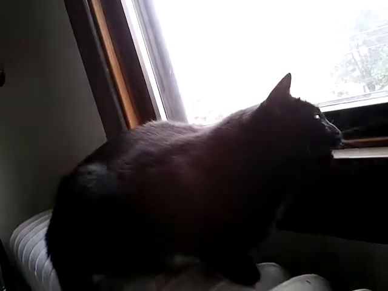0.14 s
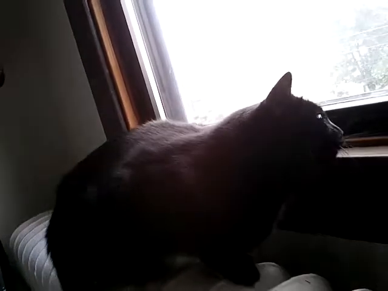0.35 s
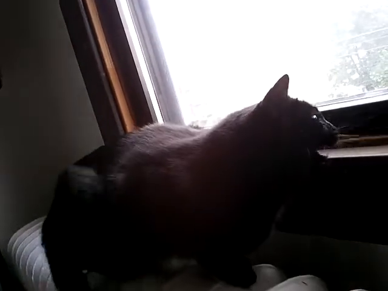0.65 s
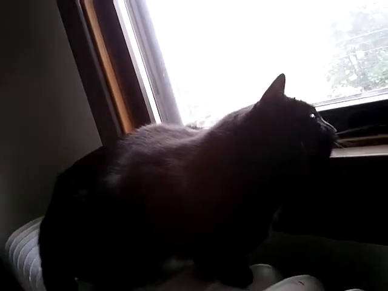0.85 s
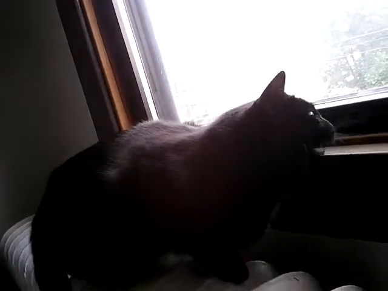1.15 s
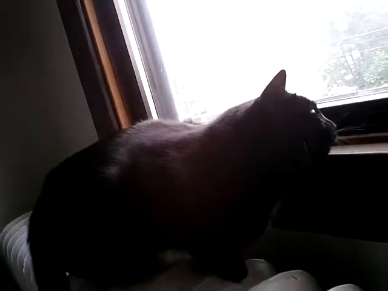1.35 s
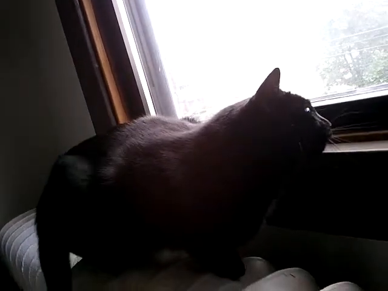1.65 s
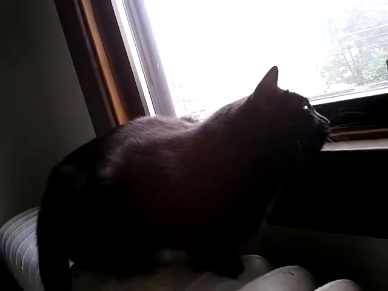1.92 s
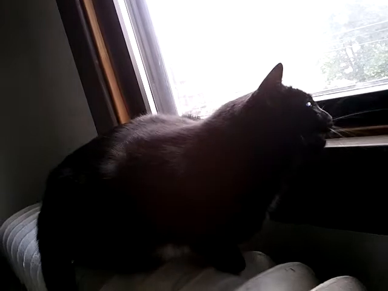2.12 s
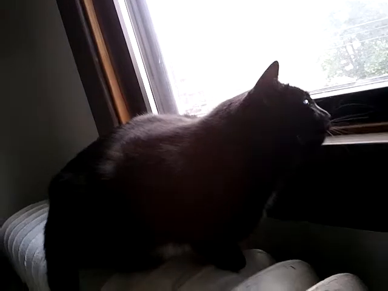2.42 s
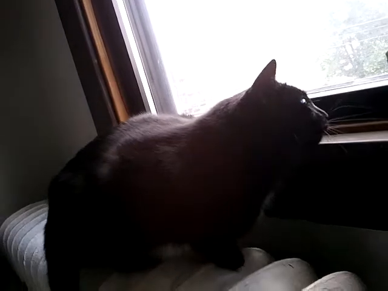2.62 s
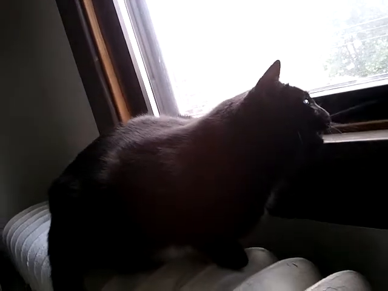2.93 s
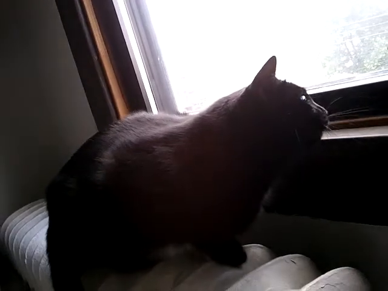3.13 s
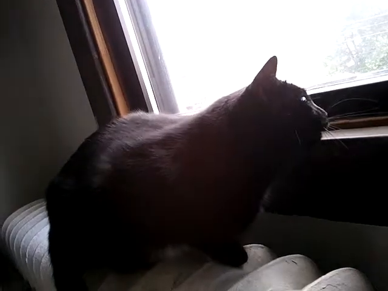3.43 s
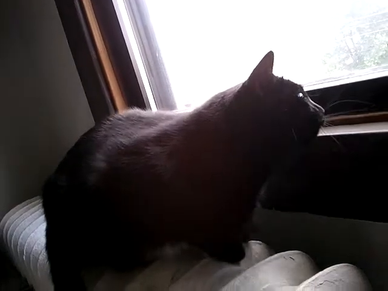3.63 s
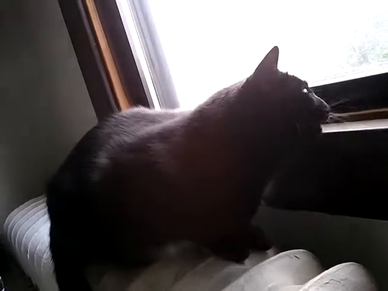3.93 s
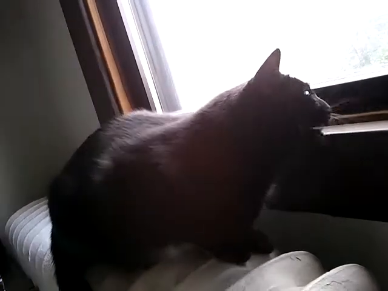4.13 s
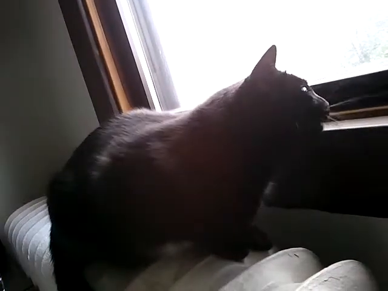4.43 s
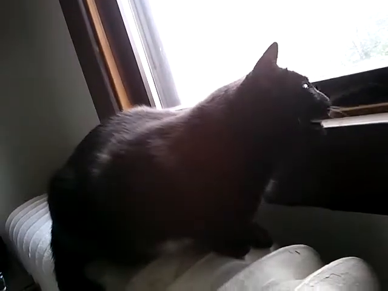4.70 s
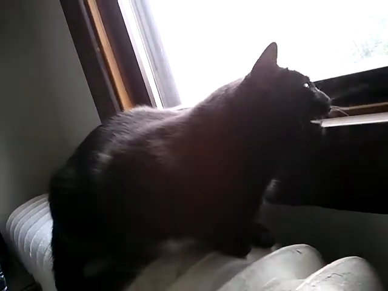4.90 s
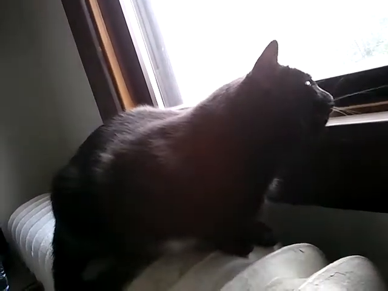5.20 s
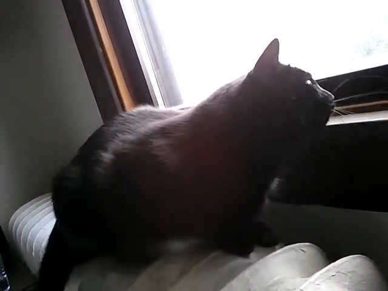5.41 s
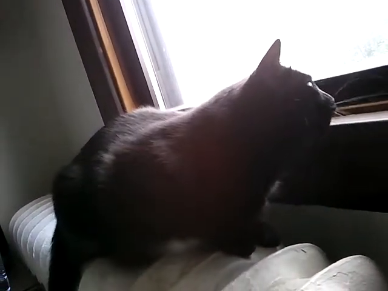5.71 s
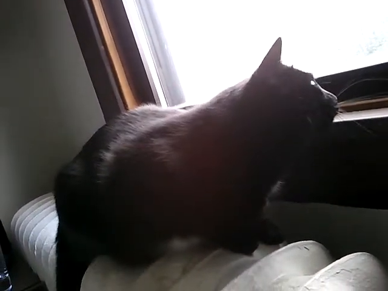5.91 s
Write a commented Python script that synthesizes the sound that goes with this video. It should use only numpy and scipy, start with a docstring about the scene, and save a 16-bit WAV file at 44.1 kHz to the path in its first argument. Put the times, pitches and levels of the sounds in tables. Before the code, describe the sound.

Soft, uneven clicks, breathy rasps and a couple of tiny chirps from a cat, with appliance hum and faint birds outside.

```python
"""Cat chattering at the window

In a small room a cat chatters at birds. Its lips and tongue click as the jaw opens; short raspy puffs
follow, the hard ones with a creak, and twice the voice catches in a chirp. Faint birds and a far engine
come through the glass, over a bed of appliance hum, building drone, street rumble and microphone hiss."""
import sys
import numpy as np
from scipy import signal
from scipy.fft import rfft, irfft, next_fast_len
from scipy.io import wavfile
from scipy.ndimage import uniform_filter1d, map_coordinates

SR = 44100
rng = np.random.default_rng(int(sys.argv[2]) if len(sys.argv) > 2 else 0)


def log_audio(samples):
    """Write samples as a 16-bit WAV file to the path given in sys.argv[1]."""
    # one column per channel
    frames = np.atleast_2d(samples).T
    # limit to full scale, then quantise
    limited = np.clip(frames, -1, 1)
    pcm = np.round(limited * 32767).astype(np.int16)
    wavfile.write(sys.argv[1], SR, pcm)


N = 267069

# noise colours of building, street and microphone: f/Hz, relative density/dB
BUILDING_SPECTRUM = [(12, -15), (24, -10), (34, -0.5), (47, 0), (60, -3), (70, -8), (95, -8), (130, -35.5)]
STREET_SPECTRUM = [(53, -31), (90, -1), (168, -1.5), (222, -4), (255, 0), (296, -8), (344, -5.5),
                   (540, -10), (590, -9), (1800, -17.5), (2340, -38), (3960, -120)]
HISS_SPECTRUM = [(880, -19.5), (1500, -15), (2150, -1), (2700, -2), (3420, -3.5), (3700, -3.5), (5000, -4),
                 (5410, -4), (6710, -4), (7470, -4), (8320, -32.5), (10800, -43.5), (18300, -120)]
# slow swell of the street: t/s, level/dB
STREET_SWELL = [(0.3, -60.5), (1.4, -61.5), (2.8, -62), (3.6, -60), (4.8, -61.1), (5.9, -59.5)]
# tone of the wall echoes: f/Hz, gain/dB
ROOM_EQ = [(300, -12), (1000, 5), (2100, 0), (2900, 4.5), (4200, 1), (5700, -4.5), (7200, 1.5)]
# engine partials: multiple of the firing rate, relative level/dB
ENGINE_PARTIALS = [(1, 0.5), (2, -7.5), (2.5, -6), (4.5, -13)]
# birds outside: centre t/s, length/s, f/Hz, level/dB
BIRD_CALLS = [(.438, 0.13, 5650, -63), (1.125, .065, 5390, -58.5), (2.08, 0.087, 5360, -59),
              (2.542, 0.074, 5250, -59), (2.795, 0.12, 5700, -58), (4.589, 0.13, 5710, -60),
              (5.027, 0.074, 5320, -61.5)]
# mouth clicks: t/s, level/dB, treble tilt/dB, ring pitch ratio
CLICKS = [(.187, -45, 0, 1.03), (0.79, -39.5, -3, 1.01), (.806, -46, 7, 0.92), (1.3277, -43.5, -2.5, 1.14),
          (1.5867, -46.5, -23, 1.15), (2.1938, -49, 11, 1.02), (2.2273, -40, 20, 0.98),
          (2.9844, -40, -5, 1.01), (3.1048, -45, 13, .88), (4.055, -45.5, -3, .94), (4.2343, -42, 0, 1),
          (4.4648, -41, 1.5, 1), (4.7859, -51.5, -10, .99), (5.0807, -32, 2, 1.1)]
# mouth cavity rings after a click: f/Hz, relative level/dB, t60/s
CLICK_MODES = [(1720, 0.5, 0.0039), (2020, -2, 0.016), (2500, -11, 0.027), (3535, -5, 0.015),
               (5310, 1, 0.0047), (6870, 1.5, 0.0035)]
# raspy puffs: t/s, length/s, level/dB, swell per jaw stage/dB
PUFFS = [(.002, 0.013, -58.5, -6.5), (.055, 0.035, -63.5, -1), (0.186, 0.044, -57, 1),
         (0.851, .03, -62.5, -3), (1.31, .054, -47.5, 1.2), (1.592, 0.024, -69.5, -11),
         (2.229, 0.012, -53.5, -5), (2.296, 0.031, -52.5, 2), (2.991, 0.022, -63, 0),
         (3.094, .052, -49.5, 1.5), (4.05, 0.058, -69, -4), (4.233, 0.026, -59, -3.5),
         (4.293, .033, -62.5, 3), (4.462, 0.043, -61.5, 2), (5.064, 0.056, -48, 4.5)]
# formants at three stages of the closing jaw: f/Hz, nominal width/Hz, gain/dB
OPEN_FORMANTS = [(507, 100, -8.5), (950, 220, -5), (2070, 310, 1), (2540, 440, -2.5), (3460, 230, -4),
                 (5130, 500, -6), (6450, 410, -4.5)]
NARROW_FORMANTS = [(395, 247, 5.5), (1090, 900, -13), (2300, 49, -5.5), (3300, 280, -3.5), (3830, 300, -6),
                   (5730, 680, -4), (6530, 1200, -0.5)]
SHUT_FORMANTS = [(450, 570, -11.5), (2160, 890, 1), (3090, 230, 2), (3600, 310, -8.5), (5300, 800, 1.5),
                 (6560, 960, 1)]
# throat colour of a creak: f/Hz, gain/dB
CREAK_EQ = [(550, -12.5), (1100, -12), (1650, -14), (2200, -1), (2750, -17), (3320, -7.5), (3870, -14.5),
            (4420, -27.5), (5100, -16.5), (6500, -10.5), (8000, -34)]
# voiced chirps: t/s, arch length/s, base f/Hz, mid bend/Hz, level/dB, mid swell/dB, slack tail/s
CHIRP_NOTES = [(.834, .023, 870, -75, -53, -2, .002), (2.235, 0.0556, 633.7, 28.5, -51.5, 7, 0.037)]
# throat colour, one curve per chirp: f/Hz, gain/dB
CHIRP_EQS = [
    [(800, -1.5), (1600, -3.5), (2400, 1.5), (3200, -4.5), (4000, -1.5), (4900, -8), (5700, -17),
     (6600, -2), (7300, -3.5), (8000, -11.5)],
    [(650, -9), (1310, -13.5), (1970, 3), (2600, -13), (3300, -20), (3950, -19), (4600, -47), (5280, -14),
     (5950, -13.5), (6600, -15.5), (8000, -34.5)],
]

HARD_PUFF_DB = -52   # puffs above this level open with a creak


def from_db(db):
    """Decibels to gain."""
    return 10 ** (np.asarray(db) / 20)


def rms_one(x):
    """Scale to rms 1."""
    return x / np.sqrt(np.mean(x ** 2) + 1e-20)


def clock():
    """Time of each sample in seconds."""
    return np.arange(N) / SR


def eq_gain(curve, hz):
    """Gain of an EQ curve at the given frequencies."""
    known_hz, db = np.transpose(curve)
    return from_db(np.interp(np.log(np.maximum(hz, 1)), np.log(known_hz), db))


def noise(spectrum):
    """Steady coloured noise, rms 1."""
    size = next_fast_len(N)
    white = rfft(rng.standard_normal(size))
    hz = np.arange(len(white)) * SR / size
    return rms_one(irfft(white * eq_gain(spectrum, hz), size)[:N])


def drift(rate_hz):
    """Smooth random modulation, rms 1."""
    knots = rng.standard_normal(N // 10)
    return rms_one(map_coordinates(knots, [clock() * rate_hz], order=1, mode="wrap"))


def resonate(x, hz, width_hz):
    """A unity-gain resonance, applied twice for dark valleys."""
    r = np.exp(-np.pi * width_hz / SR)
    b = (1 - r * r) / 2 * np.array([1, 0, -1])
    a = [1, -2 * r * np.cos(2 * np.pi * hz / SR), r * r]
    return signal.lfilter(b, a, signal.lfilter(b, a, x + 1e-18))


def gate(age, length, attack_s, release_s):
    """Attack, hold and release, the fades centred on age 0 and on the length."""
    return np.clip(age / attack_s + .5, 0, 1) * np.clip((length - age) / release_s + .5, 0, 1)


def around(start, length):
    """An event's samples, with handles for the fades, and their age in seconds."""
    first, last = max(0, int((start - .02) * SR)), min(N, int((start + length + .03) * SR))
    return slice(first, last), np.arange(first, last) / SR - start


def s_curve(x):
    """Smooth step from 0 to 1 around x = 0."""
    return (1 + np.tanh(x / 2)) / 2


def noise_bed(drone_db=-59, hiss_db=-68):
    """Slowly swelling street rumble, with steady building drone and microphone hiss."""
    rumble = from_db(np.interp(clock(), *np.transpose(STREET_SWELL))) * noise(STREET_SPECTRUM)
    return rumble + from_db(drone_db) * noise(BUILDING_SPECTRUM) + from_db(hiss_db) * noise(HISS_SPECTRUM)


def appliance_hum(hz=58.77, rms_db=-46.5):
    """A motor hums just below mains rate, wavering slightly."""
    level = from_db(rms_db + 0.21 * drift(18)) * np.sqrt(2)
    return level * np.sin(2 * np.pi * hz * clock() + 0.14 * drift(6.8))


def room(x, t60_s, predelay_s=0.0069):
    """Dense wall echoes that die away exponentially; wet signal only."""
    t = np.arange(SR // 2) / SR
    echoes = rng.standard_normal(len(t)) * from_db(-60 * t / t60_s) * (t > predelay_s)
    size = next_fast_len(N + len(t))
    response = rfft(echoes / np.linalg.norm(echoes), size)
    response *= eq_gain(ROOM_EQ, np.arange(len(response)) * SR / size)
    return irfft(rfft(x, size) * response, size)[:N]


def engine(from_hz=115, to_hz=153, rev_at_s=3.46, rev_s=.15, pipe_hz=181.5, half_width_hz=7, db=-62):
    """A far engine revs once; only its low orders pass the glass."""
    t = clock()
    firing_hz = from_hz + (to_hz - from_hz) * s_curve((t - rev_at_s) / rev_s)
    phase = 2 * np.pi * np.cumsum(firing_hz * (1 + 0.001 * drift(13))) / SR
    orders = sum(from_db(order_db + 2 * drift(8)) * np.sin(k * phase) for k, order_db in ENGINE_PARTIALS)
    # the exhaust booms as order 1.5 sweeps past the pipe's resonance
    detuning = (1.5 * firing_hz - pipe_hz) / half_width_hz
    boom = from_db(6) / np.hypot(1, detuning) * np.sin(2 * np.pi * pipe_hz * t)
    fade = gate(t - 3.22, length=0.74, attack_s=0.25, release_s=.3)
    return from_db(db) * fade * (rms_one(orders) + boom)


def birds(flutter_hz_per_s=3800):
    """Thin calls that buzz with pitch flutter, wider on longer calls, and one steadier whistle."""
    out, flutter = np.zeros(N), drift(700)
    calls = [(centre, length, hz, flutter_hz_per_s * length, db) for centre, length, hz, db in BIRD_CALLS]
    whistle = (5.469, .37, 6200, 45.7, -71)
    for centre, length, hz, flutter_hz, db in calls + [whistle]:
        near = slice(int((centre - length / 2) * SR), int((centre + length / 2) * SR))
        note = np.sin(2 * np.pi * np.cumsum(hz + flutter_hz * flutter[near]) / SR)
        out[near] += from_db(db) * note * np.sin(np.linspace(0, np.pi, len(note)))
    return out


def mouth_clicks(detune=0.014, lips_db=2, tongue_db=-12, tongue_lag_s=.0042):
    """Wet lips, then the tongue, part with a snap that rings the mouth, never quite the same twice."""
    out, t = np.zeros(N), np.arange(SR // 20) / SR
    hz, mode_db, t60 = np.transpose(CLICK_MODES)[:, :, None]
    tilt = np.log(hz / hz[0]) / np.log(hz[-1] / hz[0])
    for start, click_db, treble_db, ratio in CLICKS:
        decays = from_db(mode_db + treble_db * tilt - 60 * t / t60)
        for lag, snap_db in ((0, lips_db), (tongue_lag_s, tongue_db)):
            ring_hz = hz * ratio * (1 + detune * rng.standard_normal(hz.shape))
            rings = decays * np.sin(2 * np.pi * ring_hz * t)
            snap = rings[::2].sum(0) - rings[1::2].sum(0)   # modes alternate in polarity
            at = round((start + lag) * SR)
            out[at:at + len(t)] += from_db(click_db + snap_db) * snap / np.abs(snap).max()
    return out


def breath(formants, rough_db=4):
    """Air rattles in the throat in uneven spurts and sounds through the mouth; rms 1."""
    spurts = from_db(rough_db * np.tanh(drift(700)))
    air = sum(from_db(db) * resonate(spurts * rng.standard_normal(N), hz, 1.67 * width)
              for hz, width, db in formants)
    # even pressure behind each puff: level out all but the fast rattle
    return air / np.sqrt(uniform_filter1d(air ** 2, size=400) + 1e-20)


def rasps(narrow_at=0.41, shut_at=0.79, closing_speed=12, hiss_per_db_softer=0.35):
    """Each puff starts open-mouthed and crossfades to hiss as the jaw closes; soft ones hiss more."""
    levels = np.zeros((3, N))
    for start, length, db, swell_db in PUFFS:
        near, age = around(start, length)
        narrowed, shut = (s_curve(closing_speed * (age / length - at)) for at in (narrow_at, shut_at))
        crossfade = np.sqrt([1 - narrowed, narrowed * (1 - shut), narrowed * shut])
        duck_db = -1 if db > HARD_PUFF_DB else 0   # less air escapes while the folds creak
        narrow_db = -0.7 + hiss_per_db_softer * (HARD_PUFF_DB - db)
        stage_db = np.array([duck_db - swell_db, narrow_db, swell_db])
        envelope = gate(age, length, attack_s=0.0037, release_s=0.0077)
        levels[:, near] += envelope * from_db(db + stage_db)[:, None] * crossfade
    stages = (OPEN_FORMANTS, NARROW_FORMANTS, SHUT_FORMANTS)
    return sum(level * breath(formants) for level, formants in zip(levels, stages))


def voice(pitch_hz, throat_eq, jitter, sharpness=1, harmonics=12):
    """Vocal fold harmonics coloured by the throat; less sharpness is flatter in tone and rougher."""
    pitch_hz = pitch_hz * (1 + jitter * drift(500)[:len(pitch_hz)] / np.clip(sharpness, .2, 1))
    k = np.arange(1, harmonics + 1)[:, None]
    gains = eq_gain(throat_eq, k * pitch_hz) ** sharpness
    partials = gains * np.sin(2 * np.pi * k * np.cumsum(pitch_hz) / SR)
    return partials.sum(0) / np.sqrt((gains ** 2).sum(0) / 2)


def creaks(hz=553.2, puff_share=0.52, trim_db=-1.5, fade_s=.005):
    """At the front of a hard puff the folds flap unsteadily before the voice breaks into air."""
    out = np.zeros(N)
    for start, length, db, _ in PUFFS:
        if db > HARD_PUFF_DB:
            near, age = around(start, length)
            envelope = gate(age - fade_s / 2, puff_share * length - fade_s / 2, fade_s, fade_s)
            creak = voice(np.full(len(age), hz), CREAK_EQ, jitter=0.02)
            out[near] += from_db(db + trim_db) * envelope * creak
    return out


def chirps(slacken_s=0.0073, slack_sharpness=0.49, slack_db=-1.5, slack_pitch_rise=0.036):
    """The voice catches: one arch of effort bends pitch and level, then the folds slacken."""
    out = np.zeros(N)
    for (start, length, hz, bend_hz, db, swell_db, tail_s), throat_eq in zip(CHIRP_NOTES, CHIRP_EQS):
        near, age = around(start, length + tail_s)
        effort = np.sin(np.pi * np.clip(age / length, 0, 1))
        slack = np.clip((age - length) / slacken_s + .5, 0, 1)
        pitch_hz = hz * (1 + slack_pitch_rise * slack) + bend_hz * effort
        sharpness = 1 - slack * (1 - slack_sharpness)
        tone = voice(pitch_hz, throat_eq, jitter=.004 + .007 * slack, sharpness=sharpness)
        envelope = gate(age, length + tail_s, attack_s=.006, release_s=.009)
        out[near] += from_db(db + swell_db * effort + slack_db * slack) * envelope * tone
    return out


def scene(reverb_db=-9):
    """Mono mix: the cat up front with a little room; fully wet birds, the engine and the bed behind."""
    cat = mouth_clicks() + rasps() + creaks() + chirps()
    reverb = from_db(reverb_db) * room(cat, t60_s=0.38)
    outdoors = room(birds(), t60_s=0.12) + engine()
    return (cat + reverb + outdoors + appliance_hum() + noise_bed())[None]


def record(dry, cutoff_hz=8150, dc_offset=-.0996):
    """A steep high cut, and a converter that sits off zero."""
    high_cut = signal.ellip(8, .2, 70, cutoff_hz, fs=SR, output="sos")
    return signal.sosfilt(high_cut, dry) + dc_offset


dry = scene()
out = record(dry)
log_audio(out)
```